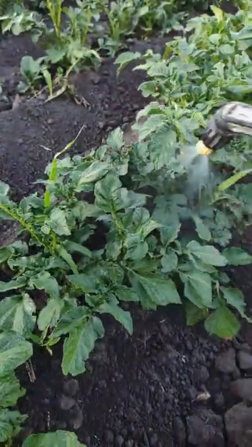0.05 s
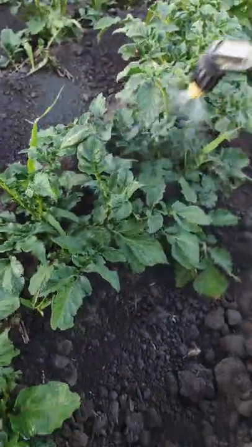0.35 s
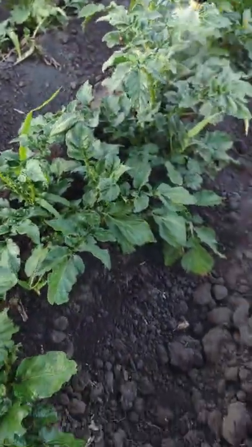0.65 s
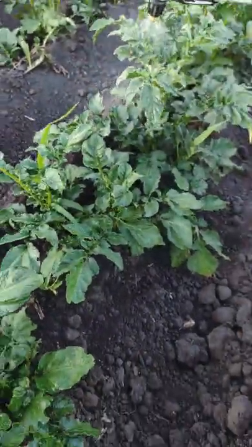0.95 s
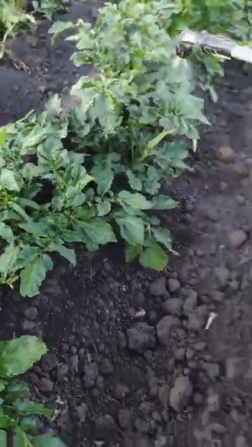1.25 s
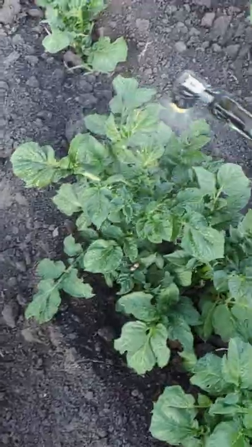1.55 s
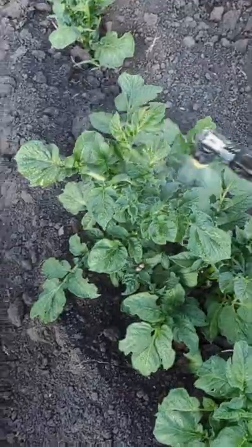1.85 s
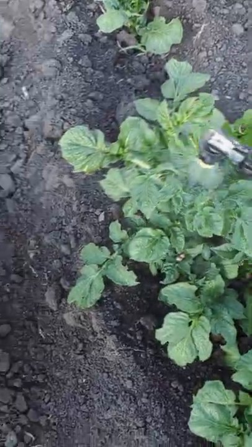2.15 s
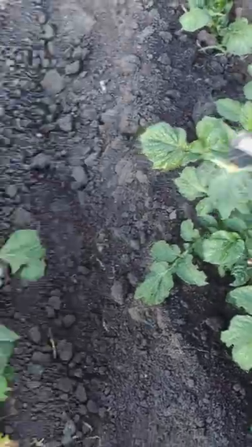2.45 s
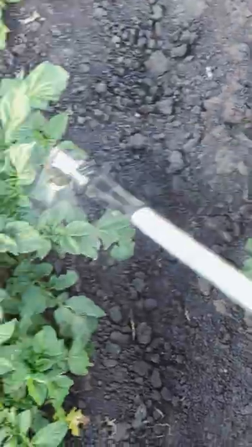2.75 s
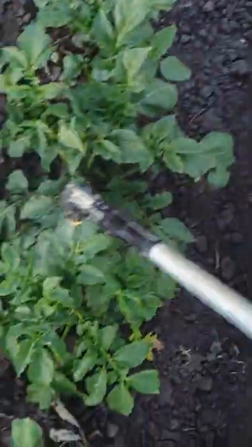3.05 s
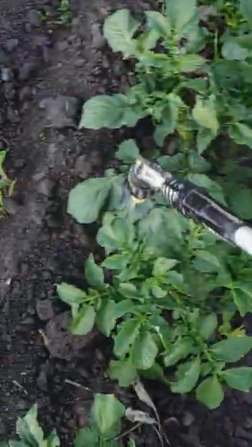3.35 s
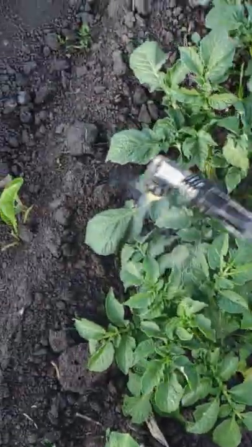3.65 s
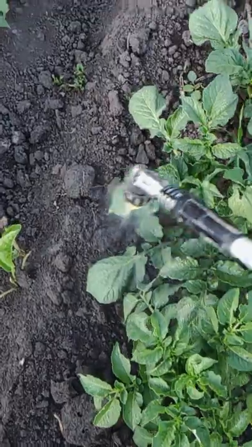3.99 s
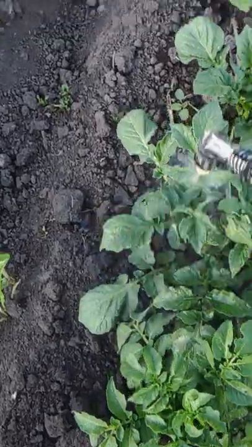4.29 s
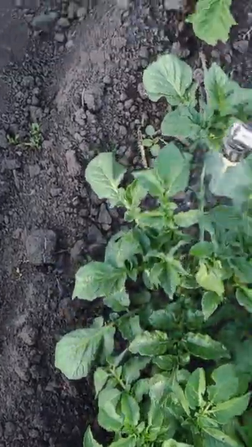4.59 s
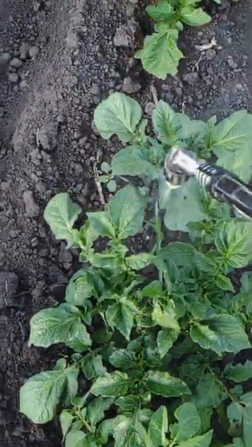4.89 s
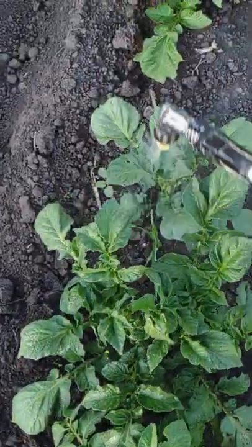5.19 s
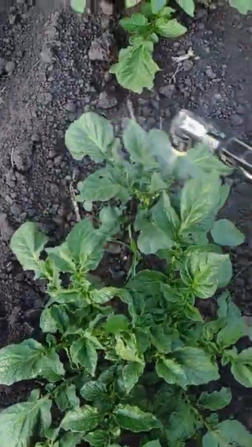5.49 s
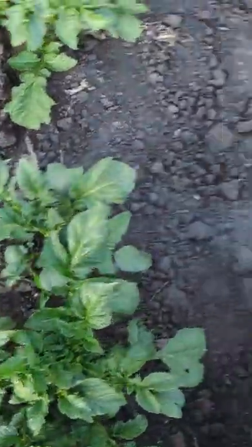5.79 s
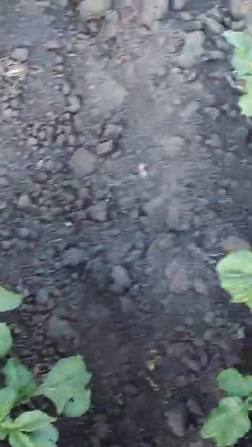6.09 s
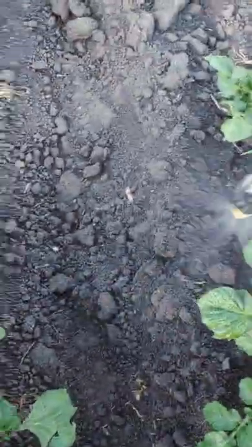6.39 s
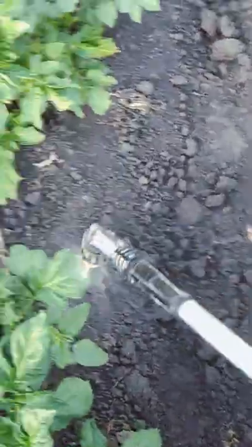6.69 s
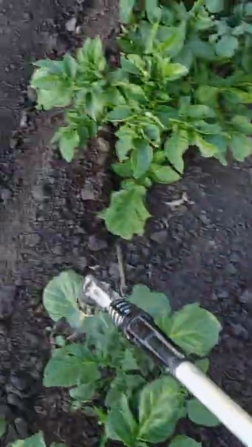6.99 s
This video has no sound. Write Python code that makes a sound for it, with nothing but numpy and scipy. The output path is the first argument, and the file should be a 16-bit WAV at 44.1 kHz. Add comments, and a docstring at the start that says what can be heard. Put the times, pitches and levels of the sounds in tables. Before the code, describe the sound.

A garden sprayer's wand hisses steadily about a metre away, its tone shifting as the mist sweeps over leaves and soil. Just over a second in, one hard tick snaps close by and the sound cuts out briefly. The hiss fades back slightly quieter, while irregular gusts rumble and thump on the hand-held microphone. Faint drops patter on the leaves and loose soil scuffs softly now and then.

```python
"""A steady hiss of mist comes from a garden sprayer's wand about a metre away, changing colour as the jet
sweeps over leaves and soil. Drops patter faintly and loose soil scuffs. Gusts rumble and thump on the two ports
of a hand-held microphone. One hard tick snaps close by; just after it the scene changes: the sound breaks off
and fades back in, the jet quieter and coloured differently by the hand."""
import sys
import numpy as np
from scipy import signal
from scipy.io import wavfile
from scipy.ndimage import uniform_filter1d

SR = 44100
rng = np.random.default_rng(int(sys.argv[2]) if len(sys.argv) > 2 else 0)


def generate_wav(sig):
    """Save sig (samples, or channels by samples) to the path in sys.argv[1] as 16-bit PCM at SR."""
    pcm = np.round(np.clip(np.atleast_2d(sig).T, -1, 1) * 32767).astype(np.int16)
    wavfile.write(sys.argv[1], SR, pcm)


N = 310464
TIME = np.arange(N) / SR
DROP_S, RETURN_S = 1.353, 1.394  # the break in the sound
CUTOFF_HZ = 15900

# Spectrum of the mist. Each row: frequency in Hz, relative spectral level in dB.
MIST_SPECTRUM = [(400, -5.5), (700, -5.5), (1100, -10), (1900, -9.5), (2800, -9.5), (4200, -6.5),
                 (6800, -3), (7900, 0.5), (8800, -5.5), (9900, -17), (11500, -15.5), (15500, -13.5)]
# Before the break the nozzle swings right and its water sheet sings.
# Each row: time in seconds, lag of the left port in ms, gain of the singing band in dB.
NOZZLE_SWING = [(0, .21, -3), (.3, 0.23, -1), (.6, .3, 1.5), (1.05, 0.304, 1), (1.35, 0.29, 2)]
# The hiss at the two ports. Each row: frequency in Hz, shared fraction of the power,
# lag of the left port after the break in ms.
PORT_COHERENCE = [(150, 0.65, .02), (796, 0.45, 0.055), (2170, 0.55, 0.095), (2930, 0.43, 0.17),
                  (4240, 0.44, .11), (5000, 0.5, .14), (5800, 0.42, .17), (7950, 0.24, 0.23),
                  (10600, 0.18, 0.227), (15000, 0.2, .28)]
def nozzle(sheet_hz=7400, sheet_width_hz=1500, flutter_db=0.79, patchy_db=1.74):
    """Atomisation: fine mist makes smooth noise, which arrives partly direct and partly scattered."""
    hz, s, (direct, *scattered) = noise_frames(channels=3, size=512)
    early = s < RETURN_S
    early_lag_ms, sheet_db = in_time(NOZZLE_SWING, s)
    colour = rms_one(from_db(at_hz(MIST_SPECTRUM, hz)[0]))
    shade_db = np.where(early, sheet_db, 0) * bell(hz, sheet_hz, sheet_width_hz)
    shade_db += flutter_db * drift(25, s)
    # passing leaves shade each part of the spectrum in turn
    for centre in np.linspace(0, CUTOFF_HZ, num=48):
        shade_db += patchy_db * drift(3.95, s) * bell(hz, centre, width=340)
    shared, late_lag_ms = at_hz(PORT_COHERENCE, hz)
    lag = delay(hz, np.where(early, early_lag_ms, late_lag_ms))
    left = np.sqrt(shared) * direct * lag + np.sqrt(1 - shared) * scattered[0]
    right = np.sqrt(shared) * direct + np.sqrt(1 - shared) * scattered[1]
    left *= hand_hollow(hz, early) * reflection(hz, s)
    return to_sound(np.array([left, right]) * colour * from_db(jet_db(hz, s) + shade_db))


# Nearness of the nozzle before and after the break. Each row: time in seconds, relative level in dB.
NEARNESS_BEFORE = [(0.0, -33.5), (0.14, -34.5), (0.386, -34.5), (1.2, -38)]
NEARNESS_AFTER = [(1.8, -41.5), (1.94, -40.5), (2.91, -41), (3.48, -38.5), (4.22, -39), (4.59, -37.5),
                  (4.98, -37.5), (5.86, -40.5), (6.34, -39), (6.57, -41.5), (7.04, -40)]
# Mist on leaves or bare soil lifts or dulls one band. Each row: centre time in seconds,
# length in seconds, gain in dB, centre frequency in Hz, bandwidth in Hz.
SURFACE_SPLASHES = [(0.148, 0.87, 4, 2500, 7000), (.05, 0.2, 3, 9100, 14300),
                    (0.447, 0.093, 3.5, 7850, 1510), (1.28, 0.15, 4.5, 11000, 7000),
                    (1.93, 0.27, 5, 7550, 1600), (3.15, 0.39, 2.5, 7700, 1200), (3.2, .6, -3, 3300, 1200),
                    (4.946, 0.081, 3.5, 4530, 5000), (5.16, 0.082, 2.3, 4500, 4500),
                    (5.46, .2, 5, 3400, 900), (5.68, .1, 2.5, 4400, 1500), (6.27, 0.32, 3.5, 6200, 1500),
                    (6.7, 1.5, 4.5, 3020, 1110), (6.95, .4, 4, 1450, 600), (6.8, 1.1, -2.5, 11400, 4500)]
def jet_db(hz, s, brightening=0.25):
    """Spreading loss: a nearer jet is louder. It is brighter too, and each surface colours it."""
    early = s < RETURN_S
    near_db = np.where(early, in_time(NEARNESS_BEFORE, s)[0], in_time(NEARNESS_AFTER, s)[0])
    strength_db = np.where(early, 3, 2.5)
    db_per_octave = np.where(early, 0.12, -0.125) + brightening * (near_db - near_db.mean())
    octaves = np.log2(np.maximum(hz, 500) / 8000)
    splash_db = sum(db * bell(s, at, length) * bell(hz, centre, width)
                    for at, length, db, centre, width in SURFACE_SPLASHES)
    return near_db + strength_db + db_per_octave * octaves + splash_db


# Bands of the cupped hand. Each row: centre in Hz, width in Hz, gains in dB before and after the break.
HAND_BANDS = [(1176, 540, 2.5, 7), (2202, 560, 5.5, 11.5), (2770, 560, 4.5, 5.5), (4300, 1020, 2.5, 9.8),
              (4840, 270, 0.5, -4), (5800, 440, 0, 1), (8870, 650, -3.5, 1.5), (11300, 2600, 1.7, 4),
              (14500, 3700, 3, 5.5)]
def hand_hollow(hz, early, left_boost_db=2):
    """Cavity resonance: the hand colours the hiss at the left port, where the jet is louder."""
    hollow_db = sum(np.where(early, early_db, late_db) * bell(hz, centre, width)
                    for centre, width, early_db, late_db in HAND_BANDS)
    return from_db(hollow_db + left_boost_db)


# A close reflection shifts as the wand moves. Each row: time in seconds, delay in ms.
REFLECTION_DELAY = [(0, 0.7), (1.35, 0.65), (1.5, 0.55), (2.6, 0.67), (2.95, 0.72), (3.6, 0.68),
                    (4.4, 0.63), (5.25, 0.73), (5.45, 0.66), (7.04, 0.73)]
def reflection(hz, s, strength=0.11):
    """Comb filtering: direct and reflected sound interfere, rippling the spectrum."""
    return np.abs(1 - strength * delay(hz, in_time(REFLECTION_DELAY, s)[0]))


# Gusts on the ports. Each row: start of the hold in seconds, hold in seconds,
# relative left and right levels in dB.
WIND_GUSTS = [(0.045, 0.53, -28, -45), (0.386, 0.23, -32, -33.5), (0.944, .03, -44, -31),
              (1.57, 0.078, -12, -45), (1.674, .03, -27, -25), (1.73, .31, -16, -46),
              (2.091, .11, -20, -50), (2.42, 0.19, -21.5, -49), (2.71, .04, -30.5, -50),
              (2.862, 0.22, -23, -34), (3.171, 0.083, -21, -26), (3.275, .13, -34, -19),
              (3.555, 0.063, -19, -50), (3.906, .1, -24.5, -29), (4.04, 0.13, -19.5, -24),
              (4.193, .12, -41, -21), (4.364, .07, -11.5, -12.5), (4.504, 0.35, -19.5, -22),
              (4.917, 0.035, -24, -30.5), (5.096, 0.36, -32, -36.5), (5.832, 0.23, -14.5, -35),
              (6.103, 0.056, -19.5, -40), (6.328, 0.15, -30.5, -52), (6.634, 0.058, -32, -29.5),
              (6.957, 0.054, -34, -22.5)]
def airflow_db(s, breeze_left_db=-35, breeze_right_db=-45, attack_s=0.024, release_s=0.039):
    """Powers add: each gust rises, holds and dies away over a light breeze."""
    power = from_db([[breeze_left_db], [breeze_right_db]]) ** 2
    for start, hold, left_db, right_db in WIND_GUSTS:
        rise = np.exp(-np.maximum(start - s, 0) / attack_s)
        fall = np.exp(-np.maximum(s - start - hold, 0) / release_s)
        power = power + (from_db([[left_db], [right_db]]) * rise * fall) ** 2
    return 10 * np.log10(power)


def wind(db_per_octave=20, steepness=3.43, lowest_hz=10, lumpy_db=4, gain_db=-0.5, buffet_db=1.34):
    """Turbulence at each port: stronger flow sheds smaller eddies, so the rumble reaches higher."""
    hz, s, frames = noise_frames(channels=2, size=2048)
    flow_db = airflow_db(s) + buffet_db * np.array([drift(14, s), drift(14, s)])
    octaves = (flow_db[:, None] + 24) / db_per_octave
    corner_hz = np.array([72, 120])[:, None, None] * 2 ** octaves  # left, right
    highpass = hz / np.hypot(hz, lowest_hz)
    lowpass = 1 / np.sqrt(corner_hz * (1 + (hz / corner_hz) ** (2 * steepness)))
    rumble = to_sound(frames * highpass * lowpass)
    rumble *= from_db(lumpy_db * np.array([drift(50, TIME), drift(50, TIME)]))
    power = uniform_filter1d(uniform_filter1d(rumble ** 2, size=2600), size=2600)
    level_db = gain_db + np.array([np.interp(TIME, s, port) for port in flow_db])
    return rumble / np.sqrt(power + 1e-20) * from_db(level_db)


# Eddies that hit a port. Each row: centre time in seconds, peak level in dB, half period in ms,
# port (0 left, 1 right).
EDDIES = [(1.579, -22, 7.8, 0), (1.626, -2.5, 4.5, 0), (1.853, -6.5, 4.8, 0), (2.056, -9.5, 5.8, 0),
          (2.578, -7.5, 5.8, 0), (3.052, -9, 4.9, 0), (3.587, -15, 7.3, 0), (4.367, -12, 2.6, 1),
          (4.392, -1, 11, 0), (4.413, -13, 9.2, 0), (4.419, -14, 3.9, 1), (4.543, -5, 2.37, 1),
          (4.61, -7.5, 8.4, 1), (4.782, -1, 6.3, 0), (5.107, -16.5, 9.1, 0), (5.941, -3, 13.3, 0),
          (5.944, -11.5, 2, 0)]
def thumps(roughness=0.097, rough_hz=260):
    """Dynamic pressure: a passing eddy pushes on the port, then sucks; smaller eddies ride on it."""
    out = np.zeros((2, N))
    lowpass = signal.butter(4, rough_hz, fs=SR, output="sos")
    small_eddies = rms_one(signal.sosfilt(lowpass, rng.standard_normal(N)))
    for s, db, half_ms, port in EDDIES:
        phase = (TIME - s) / (half_ms / 2000)
        near = np.abs(phase) < 2 * np.pi
        out[round(port), near] -= from_db(db) * phase[near] * np.exp((1 - phase[near] ** 2) / 2)
    return out * (1 + roughness * small_eddies)


# The tick and its rebound. Each row: start in seconds, relative left and right levels in dB.
IMPACTS = [(1.2582, 5.5, -4), (1.2605, -0.5, -19)]
# Modes of the tick. Each row: frequency in Hz, relative level in dB, time to fall 60 dB in seconds.
IMPACT_MODES = [(644, -16.5, 0.0038), (1200, -18, 0.0061), (2020, -6, 0.0044), (3180, -2, 0.0072),
                (4120, -3, 0.01), (4610, 5, 0.0083), (5406, 1.5, 0.0076), (5840, -9.5, 0.013),
                (7300, -18, 0.0053), (8900, -5, 0.0034), (11740, -22, 0.0059), (14740, -18, .012)]
def tick(gain_db=1, right_lead_s=0.00012, crack_db=-3, crack_t60=0.011, rise_s=0.00021):
    """Impact excitation: something hard snaps close by, with a dry crack and quickly damped modes."""
    out = np.zeros((2, N))
    age = np.arange(SR // 10) / SR
    ring = sum((-1) ** k * from_db(db - 60 * age / t60) * np.sin(2 * np.pi * hz * age)
               for k, (hz, db, t60) in enumerate(IMPACT_MODES))
    for s, left_db, right_db in IMPACTS:
        noise = band(rng.standard_normal(len(age)), low_hz=300, high_hz=8000)
        crack = noise * from_db(crack_db - 60 * age / crack_t60)
        snap = (ring + crack) * (1 - np.exp(-age / rise_s))
        for port, (start, db) in enumerate([(s + right_lead_s, left_db), (s, right_db)]):
            at = round(start * SR)
            out[port, at:at + len(age)] += from_db(gain_db + db) * snap
    return out


# Soft pops as the sound returns. Each row: start in seconds, peak level in dB.
SOFT_POPS = [(1.455, -25.5), (1.515, -26)]
def settling(start_s=1.44, rise_s=0.075, swell_db=-14.5, pop_decay_s=0.013):
    """Step transients: two small jumps in a subsonic swell after the break sound as pops."""
    phase = np.maximum(TIME - start_s, 0) / rise_s
    steps = sum(from_db(db) * (TIME > s) * np.exp(-np.abs(TIME - s) / pop_decay_s)
                for s, db in SOFT_POPS)
    return from_db(swell_db) * phase * np.exp(1 - phase) - steps


# Scuffs on loose soil. Each row: centre time in seconds, left level in dB, half width in seconds.
SOIL_SCUFFS = [(0.275, -43.5, 0.15), (2.763, -42.5, 0.13), (3.297, -50, 0.16), (3.47, -43.5, 0.048),
               (4.895, -47, 0.041), (6.895, -37, 0.01)]
def scuffs(grain_db=3, right_db=-4):
    """Granular friction: crumbs of soil grind together in short dull swells."""
    swell = sum(from_db(db) * bell(TIME, s, 2 * half_width) for s, db, half_width in SOIL_SCUFFS)
    crumbs = rng.standard_normal(N) * from_db(grain_db * drift(300, TIME))
    return swell * band(crumbs, low_hz=450, high_hz=1600) * from_db([[0], [right_db]])


def droplets(per_s=120, level_db=-51, spread_db=3):
    """Shot noise: the larger drops strike the leaves at random and patter faintly."""
    sizes = from_db(spread_db * np.minimum(rng.exponential(1, (2, N)), 3))
    clicks = sizes * (rng.random(N) < per_s / SR) + 1e-18
    return from_db(level_db) * band(clicks, low_hz=1500, high_hz=8000)


def from_db(db):
    """Decibels to gain."""
    return 10 ** (np.asarray(db) / 20)


def in_time(rows, s):
    """The columns of a curve at the times s."""
    times, *columns = np.transpose(rows)
    return [np.interp(s, times, c) for c in columns]


def at_hz(rows, hz):
    """The columns of a spectrum at the frequencies hz."""
    points, *columns = np.transpose(rows)
    return [np.interp(np.log(hz + 1), np.log(points), c) for c in columns]


def bell(x, centre, width):
    """A Gaussian of height 1 and the given width at half height."""
    return 0.5 ** ((2 * (x - centre) / width) ** 2)


def delay(hz, ms):
    """A delay as a phase shift proportional to frequency."""
    return np.exp(-2j * np.pi * hz * ms / 1000)


def rms_one(x):
    """Scale to rms 1."""
    return x / np.sqrt(np.mean(x ** 2) + 1e-20)


def band(x, low_hz, high_hz):
    """Band-pass and scale to rms 1."""
    return rms_one(signal.sosfilt(signal.butter(2, [low_hz, high_hz], "band", fs=SR, output="sos"), x))


def drift(per_s, s):
    """A random wander of rms 1 at the times s."""
    knots = rng.standard_normal(4096)
    return rms_one(np.interp(s * per_s, np.arange(len(knots)), knots))


def noise_frames(channels, size):
    """White noise as short-time spectra: Hz (a column), seconds, frames."""
    hz, s, frames = signal.stft(rng.standard_normal((channels, N)), SR, nperseg=size)
    return hz[:, None], s, frames


def to_sound(frames):
    """Short-time spectra back to samples."""
    return signal.istft(frames, SR)[1][..., :N]


def scene():
    """Superposition: spray and ground sounds add to the wind and the tick at the microphone."""
    return nozzle() + droplets() + scuffs() + wind() + thumps() + tick()


def record(dry, fade_s=0.11):
    """Limiting and filtering: the sound breaks off and fades back in; peaks clip and the top is cut."""
    fade_in = 1 - np.exp(-np.maximum(TIME - RETURN_S, 0) / fade_s)
    tail = 0.15 * np.exp(-np.abs(TIME - DROP_S) / 0.007)
    gate = np.where(TIME < DROP_S, 1, fade_in + tail)
    clipped = np.clip(dry * gate + settling(), -0.95, 0.95)
    return signal.sosfilt(signal.ellip(12, 0.1, 80, CUTOFF_HZ, fs=SR, output="sos"), clipped)


dry = scene()
out = record(dry)
generate_wav(out)
```